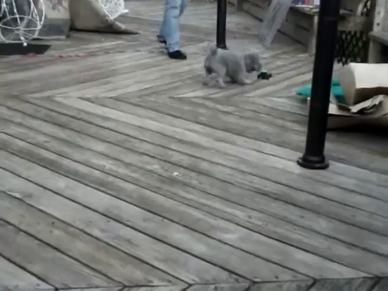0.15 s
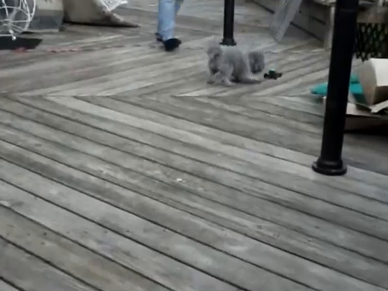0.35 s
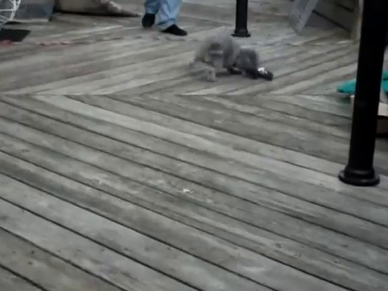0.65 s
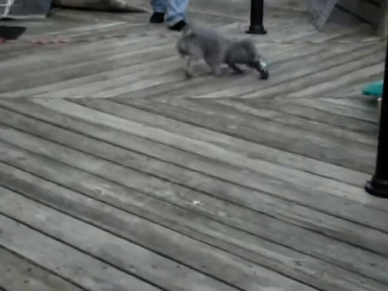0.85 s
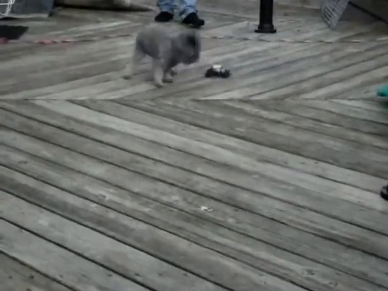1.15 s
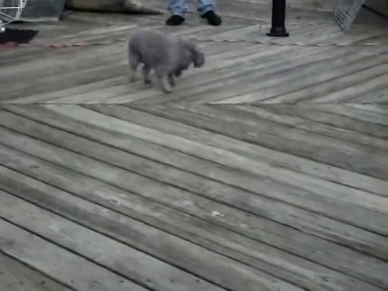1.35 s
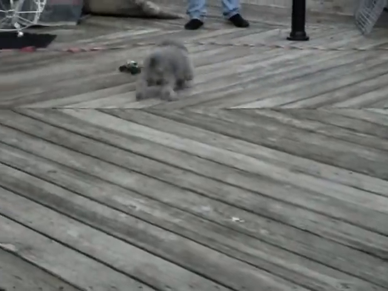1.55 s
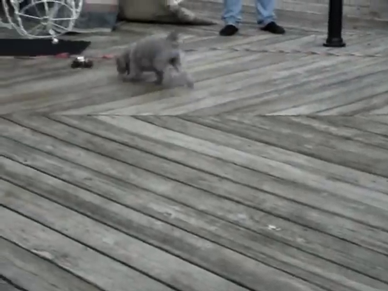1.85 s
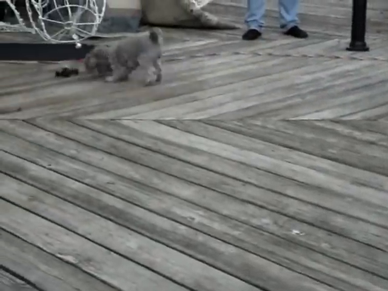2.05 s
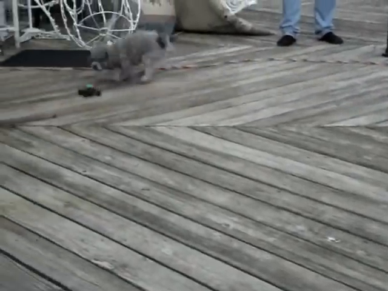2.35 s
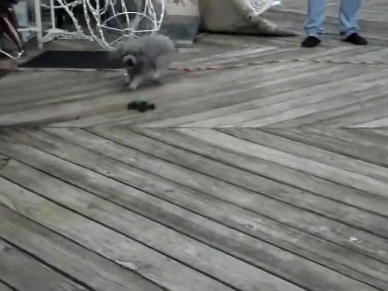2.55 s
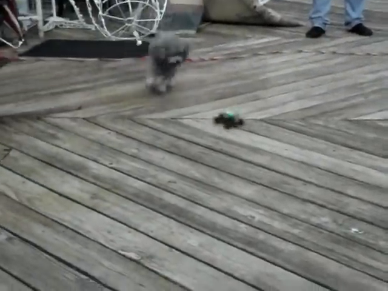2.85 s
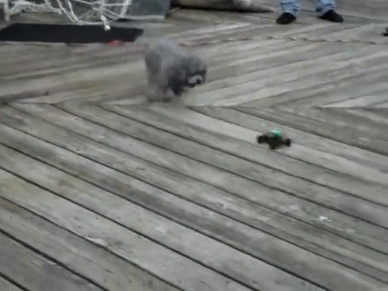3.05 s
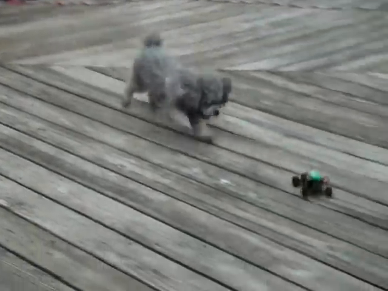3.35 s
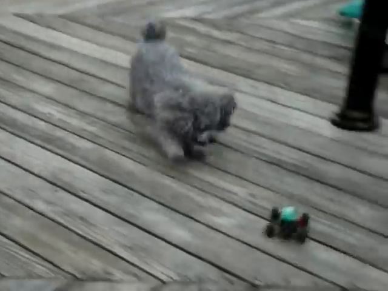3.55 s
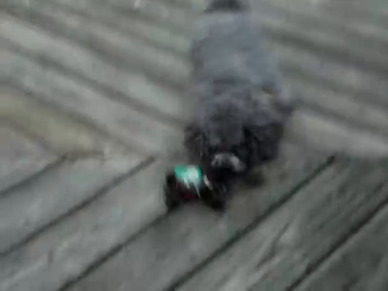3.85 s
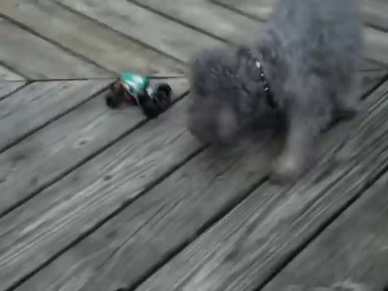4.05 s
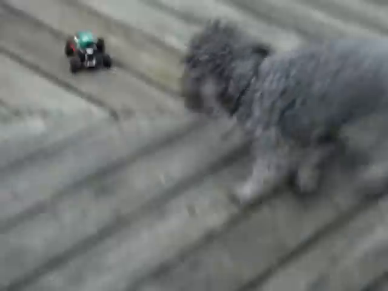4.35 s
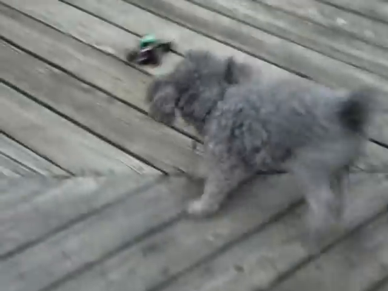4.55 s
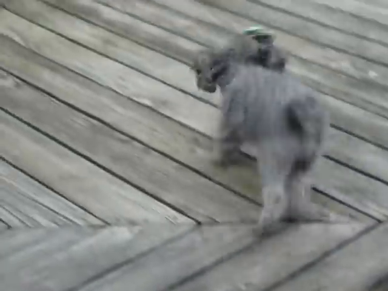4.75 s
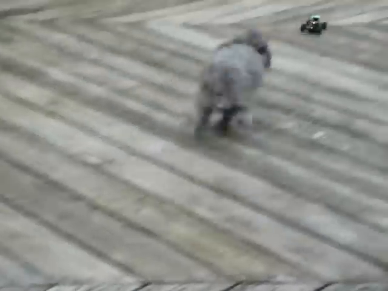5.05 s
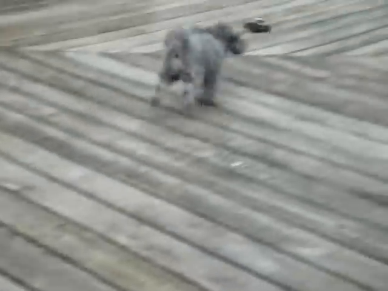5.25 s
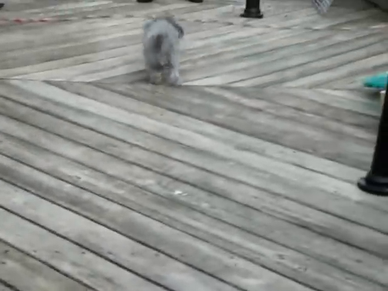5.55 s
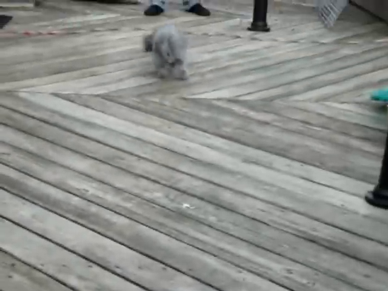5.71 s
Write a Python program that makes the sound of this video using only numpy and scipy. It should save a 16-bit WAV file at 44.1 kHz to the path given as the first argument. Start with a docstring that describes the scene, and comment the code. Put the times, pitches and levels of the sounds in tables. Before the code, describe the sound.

On an open wooden deck with light, low wind buffeting, a small dog gives two short high barks at about 0.05 and 0.3 s, each starting hoarse and ending in a quick drop, with a brief slap back from a wall. From 0.2 to 0.85 s a toy truck's gears slip in a raspy ratcheting buzz, with another short slip near 1 s. A low drone swells around 1.1 s and fades by 1.5 s; tiny motor squeals chirp near 0.5 and 1.3 s. Wheels scrub and drum on the boards. Two more barks come at 2.3 and 2.6 s, among sharp plastic knocks. The truck nears around 3.7 s with soft paw thumps, then barks at 3.9 and 4.2 s. Knocks and rattles crowd 4 to 5.5 s, the buzz swelling near 4.7 s; a last squeal comes at 5.7 s. The sound is dull, and barks press everything else down.

```python
"""A puppy chases a toy truck over a wooden deck in light wind; a wall throws its barks back.
It opens with two high barks, pitched pulses and air through a throat; gears, tooth ticks in a shell, slip.
A low drone swells and fades, the motor squeals, and wheels and paws clatter as filtered noise and struck modes.
A second pair of barks comes mid-way, then the truck runs near and a third pair follows.
Knocks crowd the last part. A dull microphone and a limiter shape it all."""
import sys
import numpy as np
from scipy import signal
from scipy.fft import rfft, irfft, next_fast_len
from scipy.io import wavfile
from scipy.ndimage import uniform_filter1d

SR = 44100
rng = np.random.default_rng(int(sys.argv[2]) if len(sys.argv) > 2 else 0)


def unload_wav(signal):
    """Save mono or channel-first audio to the path in sys.argv[1] as 16-bit WAV at rate SR, clipped to [-1, 1]."""
    wavfile.write(
        sys.argv[1],
        SR,
        np.round(np.clip(np.atleast_2d(signal).T, -1, 1) * 32767).astype(np.int16),
    )


N = 259302
TIME = np.arange(N) / SR


def amp(db):
    """Amplitude factor of a level in dB."""
    return 10 ** (np.asarray(db) / 20)


def evened(x):
    """Scales x to rms 1."""
    return x / np.sqrt(np.mean(x ** 2) + 1e-20)


def read(points, hz):
    """Interpolates (Hz, value) points on a log-frequency axis."""
    f, value = np.transpose(points)
    return np.interp(np.log(hz + 1), np.log(f + 1), value)


def follow(rows, t):
    """Interpolates each column of a time curve at the times t."""
    s, *columns = np.transpose(rows)
    return [np.interp(t, s, c) for c in columns]


def add(mix, s, sound):
    """Adds sound into mix from s seconds on."""
    part = mix[max(round(s * SR), 0):][:len(sound)]
    part += sound[:len(part)]


def coloured(x, spectrum):
    """Filters x by a spectrum in dB."""
    size = next_fast_len(2 * len(x))
    gain = amp(read(spectrum, np.fft.rfftfreq(size, 1 / SR)))
    return irfft(rfft(x, size) * gain, size)[:len(x)]


def wander(count, hz):
    """Smooth random curve of rms 1 whose spectrum falls away as a Gaussian of width hz."""
    size = next_fast_len(count)
    f = np.fft.rfftfreq(size, 1 / SR)
    spectrum = rfft(rng.standard_normal(size)) * np.exp(-(f / hz) ** 2)
    return evened(irfft(spectrum, size))[:count]


def ring(x, modes):
    """Passes x through parallel resonances of alternating sign."""
    out = 0
    for k, (hz, width_hz, db) in enumerate(modes):
        b, a = signal.iirpeak(hz, hz / width_hz, SR)
        out = out + amp(db) * signal.lfilter(b, a, x * (-1) ** k)
    return out


# Wind level. Each row: time in seconds, level in dB.
WIND_LEVEL = [(0, -28.5), (.25, -26.5), (.95, -25.5), (1.7, -31.5), (2.3, -31), (3, -35.5), (4.6, -35.5),
              (5.88, -37)]
# Spectrum of gusts. Each row: frequency in Hz, relative level in dB.
GUST_SPECTRUM = [(10, -2.5), (30, 0.5), (70, -4.5), (120, -18), (300, -47), (1000, -70.5)]


def wind(lump_db=2.5, lump_hz=8.7):
    """Lumpy low buffeting at the microphone: filtered noise under a wandering level."""
    level_db, = follow(WIND_LEVEL, TIME)
    gusts = rng.standard_normal(N) * amp(lump_db * wander(N, lump_hz))
    return amp(level_db) * evened(coloured(gusts, GUST_SPECTRUM))


# Drone level. Each row: time in seconds, level in dB.
DRONE_LEVEL = [(.3, -71), (.75, -37), (1.15, -27.5), (1.45, -39.5), (1.9, -43)]


def drone(hz=112, width_hz=14):
    """A narrow, wavering low tone: two quadrature carriers with random envelopes."""
    level_db, = follow(DRONE_LEVEL, TIME)
    turn = 2 * np.pi * hz * TIME
    tone = wander(N, width_hz) * np.cos(turn) + wander(N, width_hz) * np.sin(turn)
    return amp(level_db) * tone


# Decay of the yard's tail. Each row: frequency in Hz, time to fall 60 dB in seconds.
YARD_T60 = [(300, 0.24), (1100, 0.32), (3000, 0.37), (5000, 0.11)]


def yard(x, wall_s=0.047, wall_db=-13, scatter_s=0.017, near_db=-17, near_s=0.029, tail_db=-15):
    """The deck and a cluttered wall scatter the sound back, and a thin tail dies band by band."""
    t = np.arange(SR * 2 // 3) / SR
    sparse = rng.random(len(t)) < .05
    taps = rng.standard_normal(len(t)) * sparse * np.minimum(t / 0.0032, 1)
    hz, s, z = signal.stft(taps, SR, nperseg=256)
    decay = amp(-60 * s / read(YARD_T60, hz)[:, None])
    tail = signal.istft(z * decay, SR, nperseg=256)[1][:len(t)]
    near = rng.standard_normal(len(t)) * np.exp(-t / near_s)
    wall = rng.standard_normal(len(t)) * (t > wall_s) * np.exp(-abs(t - wall_s) / scatter_s)
    response = amp(near_db) * evened(near) + amp(wall_db) * evened(wall) + amp(tail_db) * evened(tail)
    return signal.fftconvolve(x, response / np.sqrt(len(t)))[:N]


# Paw landings. Each row: time in seconds, relative peak level in dB.
PAW_LANDINGS = [(1.705, -17.5), (3.664, -13.5), (3.707, -10.5), (3.744, -24), (3.77, -21), (3.848, -16.5),
                (3.89, -14), (4.691, -15.5), (4.77, -19.5), (4.871, -16.5)]
# Low modes of the deck. Each row: frequency in Hz, width in Hz, gain in dB.
DECK_MODES = [(163, 82, -1), (196, 40, 1.5), (274, 89, 0.5), (390, 69, -16.5)]
# Spectrum of drumming boards, also for wheels(). Each row: frequency in Hz, relative level in dB.
DRUM_SPECTRUM = [(50, -11.5), (85, 2.5), (115, -3.5), (170, 8), (290, 1.5), (420, -14), (800, -23.5),
                 (2000, -64)]


def paws(paw_db=-2, scuff=0.27, scuff_s=0.0099):
    """A soft blow and a short scuff set the deck booming."""
    out, t = np.zeros(N), np.arange(SR // 8) / SR
    for s, peak_db in PAW_LANDINGS:
        blow = np.exp(-t * 2000) + scuff * rng.standard_normal(len(t)) * np.exp(-t / scuff_s)
        boom = coloured(ring(blow, DECK_MODES), DRUM_SPECTRUM)
        add(out, s, amp(peak_db + paw_db) * boom / abs(boom).max())
    return out


# Spectrum of tyre scrub. Each row: frequency in Hz, relative level in dB.
SCRUB_SPECTRUM = [(200, -19.5), (450, -2.5), (800, -3.5), (1200, 1.5), (1700, 0), (2200, 1.5), (3000, 5.5),
                  (4200, -31.5), (5500, -29)]


def wheels(scrub_db, drum_db, grain_db=-1.5, bump_db=1.83, tyre_db=-1, deck_db=-2, thud_db=2.0):
    """Tyres and paws scrub the grain of the wood and make the boards drum: two fluttering noises."""
    grit = rng.standard_normal(N) * amp(grain_db * wander(N, 400))
    scrub = amp(scrub_db + tyre_db) * evened(coloured(grit, SCRUB_SPECTRUM))
    thuds = rng.standard_normal(N) * amp(thud_db * wander(N, 45))
    drum = amp(drum_db + deck_db) * evened(coloured(thuds, DRUM_SPECTRUM))
    return (scrub + drum) * amp(bump_db * wander(N, 16))


SLIP_EDGE_S = 0.032
# Gears slip while the truck is held.
# Each row: start in seconds, length in seconds, teeth per second, share of the buzz power 0-1.
GEAR_SLIPS = [(.2, 0.65, 188, 0.79), (0.985, 0.13, 240, 1)]


def slipping():
    """Rate and share of the ratchet, which fades in and out with each slip."""
    rate, share = np.zeros((2, N))
    for start, length, teeth_per_s, part in GEAR_SLIPS:
        held = np.clip(np.minimum(TIME - start, start + length - TIME) / SLIP_EDGE_S, 0, 1)
        rate = np.where(TIME >= start, teeth_per_s, rate)
        share += part * held
    return rate, np.clip(share, 0, 1)


# Modes of the plastic shell, also for knock(). Each row: frequency in Hz, width in Hz, gain in dB.
SHELL_MODES = [(2707, 744, -4.5), (2892, 495, 1), (3178, 312, -2), (3500, 660, -9.5)]


def gears(level_db, ticks_per_s=4000, spread_db=4.5, flutter_db=1.23, gear_db=-1, slip_db=2,
          stagger=0.0866, box_hz=2820, box_width_hz=900):
    """Dense random tooth ticks ring the shell; slipping teeth snap in the gearbox in a ratchet."""
    sizes = amp(spread_db * np.minimum(rng.exponential(1, N), 4))
    mesh = sizes * rng.choice([-1, 1], N) * (rng.random(N) < ticks_per_s / SR)
    rate, share = slipping()
    teeth = np.floor(np.cumsum(rate * (1 + stagger * wander(N, 149.6))) / SR)
    snaps = np.diff(teeth, prepend=0) * amp(slip_db * rng.standard_normal(N))
    gearbox = [(box_hz, box_width_hz, 0)]
    ratchet = ring(ring(snaps, gearbox), gearbox)
    buzz = np.sqrt(1 - share) * evened(ring(mesh, SHELL_MODES)) + np.sqrt(share) * evened(ratchet)
    return buzz * amp(level_db + gear_db + flutter_db * wander(N, 37))


SQUEAL_ATTACK_S, SQUEAL_FADE_DB = 0.005, -7.5


def squeal(start, length, first_hz, last_hz, level_db, waver=0.04, chatter_db=3.5):
    """A chattering whine that glides with the motor's speed and fades."""
    t = np.arange(0, length, 1 / SR)
    hz = first_hz + (last_hz - first_hz) * t / length
    edges = np.clip(np.minimum(t, length - t) / SQUEAL_ATTACK_S, 0, 1)
    level_db = level_db + SQUEAL_FADE_DB * t / length + chatter_db * wander(len(t), 150)
    turns = np.cumsum(hz * (1 + waver * wander(len(t), 440))) / SR
    return start, np.sqrt(2) * edges * amp(level_db) * np.sin(2 * np.pi * turns)


# The motor squeals as the wheels spin free.
# Each row: start in seconds, length in seconds, first and last pitch in Hz, rms level before the fade in dB.
MOTOR_SQUEALS = [(.474, .064, 3500, 3405, -14.5), (1.275, 0.065, 2710, 2446, -15.5),
                 (1.321, .052, 2700, 4080, -16.5), (1.418, .03, 3960, 2880, -19.5),
                 (2.089, 0.034, 2524, 3650, -15), (4.506, 0.05, 2954, 3760, -11),
                 (5.712, .034, 2713, 3127, -8)]


def squeals():
    """All the motor's whines on one track."""
    out = np.zeros(N)
    for row in MOTOR_SQUEALS:
        add(out, *squeal(*row))
    return out


RATTLE_S = 0.0083
# Modes of a board. Each row: frequency in Hz, width in Hz, gain in dB.
BOARD_MODES = [(660, 190, -14), (1290, 260, -2.5), (1667, 510, 6), (1890, 600, 10), (2150, 990, 1)]


def knock(peak_db, board_db, rattle=0.4):
    """A blow rings shell and board, and loose parts rattle briefly after it."""
    t = np.arange(SR // 20) / SR
    blow = rattle * rng.standard_normal(len(t)) * np.exp(-t / RATTLE_S)
    blow[0] += 1
    sound = evened(ring(blow, SHELL_MODES)) + amp(board_db) * evened(ring(blow, BOARD_MODES))
    return amp(peak_db) * sound / abs(sound).max()


REBOUND_S = .015
# Chance bumps over the gaps between boards; BUMP_DB is the mean peak at one metre.
BUMPS_PER_S, BUMP_DB, BUMP_SPREAD_DB, BUMP_BOARD_DB = 14, -6.5, 1, -2.5
# The truck knocks on the boards.
# Each row: time in seconds, peak in dB, board against shell in dB, rebound against first blow in dB.
TRUCK_KNOCKS = [(.449, -3, -2, -9), (0.913, -7, -20, -3.5), (1.829, -16, -10, -3), (2.2136, 4, -4, -12.5),
                (2.483, 1.5, -2.5, 0.5), (2.6815, 14.5, -23, -27.5), (2.914, -7, -14, -3),
                (2.969, -12.5, -5.5, 0), (3.029, -2, -10.5, -2), (3.798, -10.5, -10, -6),
                (3.848, -4, -6.5, -0.5), (4.0566, 12.5, -0.5, -10), (4.127, 4, -10.5, 0),
                (4.1703, -0.5, -8, -29), (4.378, -1.5, -16.5, -22.5), (4.461, -2.5, 3.5, -10),
                (4.651, 2, -5.5, 0), (4.687, 2.5, -7, -22.5), (4.773, -3, -5.5, -3.5),
                (4.864, -5.5, -5.5, -11.5), (4.932, -12, -14.5, -14), (5.01, -4, 4.5, -8),
                (5.145, -10, -5, -16), (5.283, -5, -5, -3), (5.324, -7.5, -8, -7), (5.549, -8, 5, -12.5)]


def knocks(metres):
    """Hard knocks with their rebounds, and small chance bumps that grow as the truck comes near."""
    out = np.zeros(N)
    for s, peak_db, board_db, rebound_db in TRUCK_KNOCKS:
        add(out, s, knock(peak_db, board_db))
        add(out, s + REBOUND_S, knock(peak_db + rebound_db, board_db))
    size_db = BUMP_DB - 20 * np.log10(metres) + BUMP_SPREAD_DB * rng.standard_normal(N)
    for at in np.flatnonzero(rng.random(N) < BUMPS_PER_S / SR):
        add(out, at / SR, knock(size_db[at], BUMP_BOARD_DB))
    return out


START_SHARE, END_SHARE, ARCH = 0.68, .66, 0.02  # shares of pitch: start, end of drop, bow of the held note
SILENT_DB, RELEASE_S, RELEASE_DB, RELEASE_ROUGH = -27, .05, -18.5, 0.41  # onset, then changes in the release
CLEARING_S, CLEAR_ROUGH = 0.029, .02  # the voice clears over the last of the hoarse part


def bark(start, attack, rise, hold, drop, top_hz, sag, crack_hz, hoarse, hoarse_db, clear_db, hoarse_rough):
    """One push of air: hoarse climb, clear arched sagging note, drop; gives time, pitch, effort, roughness."""
    t = np.arange(0, rise + hold + RELEASE_S, 1 / SR)
    climb = np.minimum(t / rise, 1)
    clear = np.clip((t - hoarse) / CLEARING_S + 1, 0, 1)
    held = np.clip(t - rise, 0, hold)
    after = np.maximum(t - rise - hold, 0)
    release = after / RELEASE_S
    hz = top_hz * (START_SHARE + (1 - START_SHARE) * climb + ARCH * np.sin(np.pi * held / hold))
    hz = hz + crack_hz * (t < rise) - sag * held
    hz = hz * (END_SHARE + (1 - END_SHARE) * np.exp(-after / drop))
    effort_db = hoarse_db + (clear_db - hoarse_db) * clear
    effort_db = effort_db + SILENT_DB * np.maximum(1 - t / attack, 0) + RELEASE_DB * release
    rough = hoarse_rough + (CLEAR_ROUGH - hoarse_rough) * clear + RELEASE_ROUGH * release
    return start + t, hz, effort_db, np.clip(rough, 0, 1)


UPPER_DB_PER_S = 70  # harmonics above the third gain on the rest through each bark
# Voiced throat, air past the teeth, wide open mouth when hoarse.
# Each row: frequency in Hz, relative level in dB.
THROAT_SPECTRUM = [(150, -32), (450, -19.5), (740, -21.5), (900, 11), (1150, 9), (1480, 0), (1750, -5),
                   (2150, -12.5), (2550, -9), (2750, -2), (2950, 1), (3150, -10.5), (3450, -21),
                   (4000, -19.5), (5000, -38.5)]
HISS_SPECTRUM = [(600, -60.5), (1400, -17.5), (1800, -5.5), (2200, 3.5), (2600, -19.5), (3200, 5),
                 (3700, -13), (4500, -26)]
RASP_SPECTRUM = [(100, -41), (300, -12), (500, -10), (800, -4.5), (1200, 1.5), (1550, -8), (1900, -3.5),
                 (2350, -4.5), (3100, -17.5), (3800, -14.5), (5000, -9.5)]


def voice(t, hz, effort_db, rough, hiss_db, upper_db, jitter=.085, jitter_hz=300, tremor=0.015,
          shimmer_db=2, puff_db=-1, fundamental_db=-11):
    """Pulses of the folds and puffs of air pass the throat; rough stretches shake the pitch."""
    turns = np.cumsum(hz * (1 + (tremor + jitter * rough) * wander(len(t), jitter_hz))) / SR
    upper_db = upper_db + UPPER_DB_PER_S * (t - t.mean())
    folds = 0
    for k in range(1, 9):
        # weak fundamental; higher harmonics flutter more
        level_db = fundamental_db * (k == 1) + upper_db * (k > 3)
        level_db = level_db + shimmer_db * np.sqrt(k / 2) * wander(len(t), 60)
        folds = folds + amp(level_db) * np.cos(2 * np.pi * k * turns + k * k)
    puffs = (2 + np.cos(2 * np.pi * turns)) * rng.standard_normal(len(t))  # air surges once a cycle
    tone = evened(coloured(folds, THROAT_SPECTRUM))
    hiss = amp(hiss_db) * evened(coloured(puffs, HISS_SPECTRUM))
    rasp = amp(puff_db) * evened(coloured(puffs, RASP_SPECTRUM))
    sound = (1 - rough) * (tone + hiss) + rough * rasp
    sound /= np.sqrt(uniform_filter1d(sound ** 2, size=600) + 1e-6)  # effort alone sets the level
    return t[0], amp(effort_db) * sound * signal.windows.tukey(len(t), .04)


# The puppy's barks. Each row: start, attack, pitch rise, hold and pitch drop in seconds, top pitch in Hz,
# sag in Hz per second, pitch offset during the rise in Hz, hoarse part in seconds,
# hoarse and clear effort in relative dB, hoarse roughness 0-1, hiss against tone in dB,
# harmonics above the third at mid-bark in relative dB, share sent to the wall in dB.
PUPPY_BARKS = [ (.048, 0.0055, 0.034, 0.053, 0.041, 576.4, 3, 340.5, 0.04, -11.5, 4.5, 0.21, -10.5, -1, 4),
               (.302, 0.0049, .038, 0.049, .016, 723, 103, 1, 0.063, -1.5, 2, 0.4, -15.5, -0.5, -1.5),
               (2.298, 0.049, .066, .072, 0.016, 760.5, 401, -0.5, 0.064, 3, 4.5, 0.66, -13.5, 0, -3.5),
               (2.595, 0.012, .030, .072, .028, 666, 951, -1, .108, -1.5, 8.5, 0.37, -15.5, 4, 1),
               (3.925, 0.022, .070, 0.05, .018, 726.4, 47, -0.5, .070, 0, 8, .7, -21.5, -7, 0),
               (4.210, 0.0078, 0.044, 0.097, 0.021, 608, 751.5, -0.5, .052, -2, 8, 0.58, -28, 9.5, 2.5), ]


def barks(dog_db):
    """The barks as heard directly, and as thrown at the wall."""
    dog, thrown = np.zeros((2, N))
    for *push, hiss_db, upper_db, wall_db in PUPPY_BARKS:
        s, sound = voice(*bark(*push), hiss_db, upper_db)
        add(dog, s, amp(dog_db) * sound)
        add(thrown, s, amp(dog_db + wall_db) * sound)
    return dog, thrown


DRUM_DB = -21.5  # relative level of drumming boards at one metre
# How hard the truck works. Each row: time in seconds, gear buzz and tyre scrub in relative dB.
DRIVE_LEVELS = [(0, -31, -23.5), (.05, -32, -22), (.24, -18, -21), (.46, -15, -18), (.58, -19, -19.5),
                (.97, -19, -16.5), (1.25, -24.5, -16.5), (1.58, -25.5, -24.5), (1.82, -21.5, -23),
                (1.95, -28, -26.5), (2.85, -21.5, -23.5), (3.04, -19.5, -25), (3.16, -24, -26),
                (3.55, -23.5, -24.5), (4.15, -23.5, -23), (4.68, -16, -20.5), (5.2, -24.5, -25.5),
                (5.88, -23.5, -30.5)]
# How near the truck comes. Each row: time in seconds, distance in metres.
TRUCK_DISTANCE = [(0, 4.6), (2.5, 3.1), (3.3, 3.3), (3.78, 1.1), (4.5, 3.5), (5.1, 2.35), (5.88, 4.4)]


def scene(dog_db=3, clatter_db=-3):
    """Dog, paws and truck on the deck, in a light wind; clatter_db is the clatter's share sent to the yard."""
    buzz_db, scrub_db = follow(DRIVE_LEVELS, TIME)
    metres, = follow(TRUCK_DISTANCE, TIME)
    background = wind() + drone()
    rolling = gears(buzz_db) + wheels(scrub_db, DRUM_DB - 20 * np.log10(metres))
    clatter = squeals() + knocks(metres)
    dog, thrown = barks(dog_db)
    echoes = yard(thrown + amp(clatter_db) * clatter)
    return (background + echoes + paws() + rolling + clatter + dog)[None]


EDGE_HZ = 15900
# Microphone response. Each row: frequency in Hz, gain in dB.
MICROPHONE_RESPONSE = [(3100, -0.5), (3500, -2), (3900, -5.5), (4400, -9.5), (5200, -16.5), (5700, -55.5),
                       (7000, -97)]


def record(dry, limit_db=-7.0, recover_db_per_s=170, attack_s=0.0022, knee=17):
    """A dull microphone, a limiter that ducks everything under a bark, and overload on what gets past it."""
    x = coloured(dry[0], MICROPHONE_RESPONSE)
    power_db = 10 * np.log10(abs(uniform_filter1d(x ** 2, size=200)) + 1e-12)
    fall_db = TIME * recover_db_per_s
    held_db = np.maximum.accumulate(power_db + fall_db) - fall_db
    over_db = np.maximum(held_db - limit_db, 0)
    lag = np.exp(-1 / (attack_s * SR))
    x = x / amp(signal.lfilter([1 - lag], [1, -lag], over_db))
    x = x / (1 + abs(x) ** knee) ** (1 / knee)  # the tops round off at full scale
    x = x * signal.windows.tukey(N, .001)
    lowpass = signal.firwin(511, EDGE_HZ, window=("kaiser", 9), fs=SR)
    return signal.oaconvolve(x, lowpass, "same")[None]


dry = scene()
out = record(dry)
unload_wav(out)
```